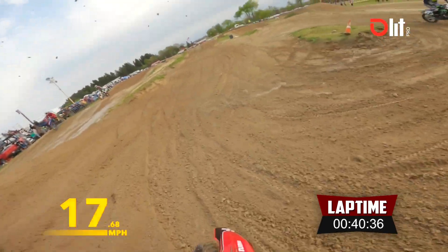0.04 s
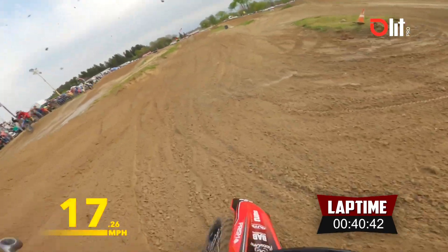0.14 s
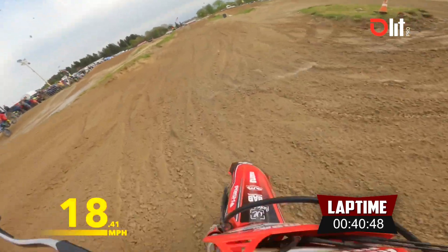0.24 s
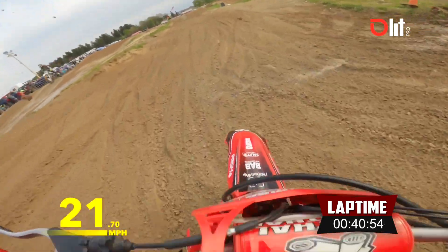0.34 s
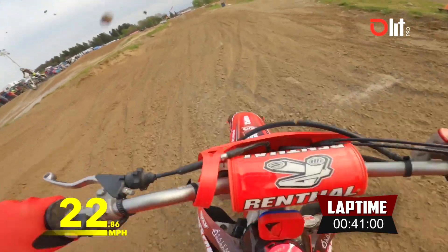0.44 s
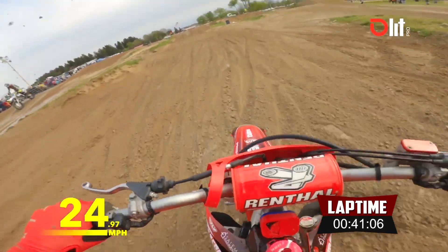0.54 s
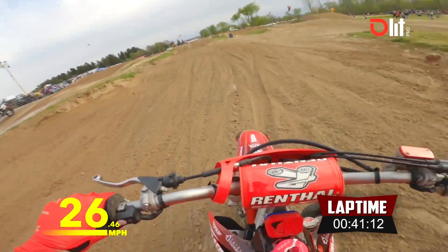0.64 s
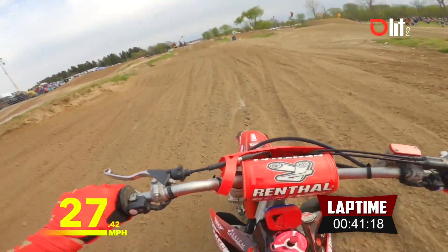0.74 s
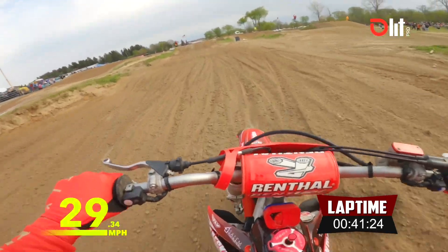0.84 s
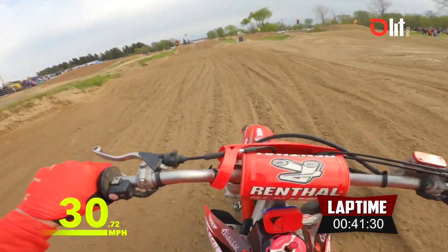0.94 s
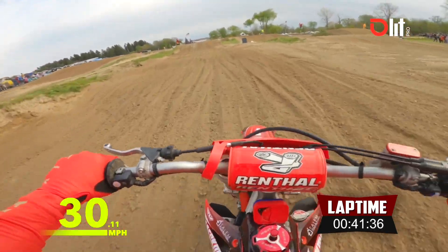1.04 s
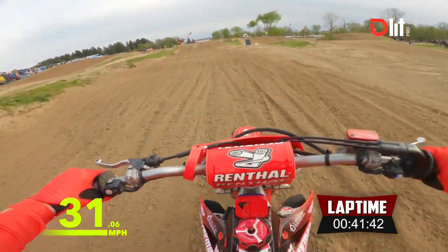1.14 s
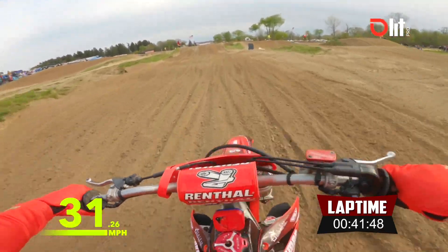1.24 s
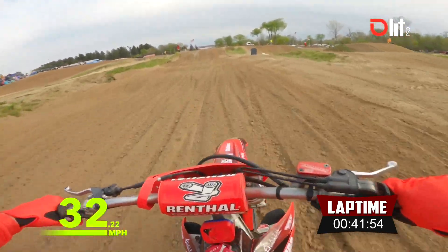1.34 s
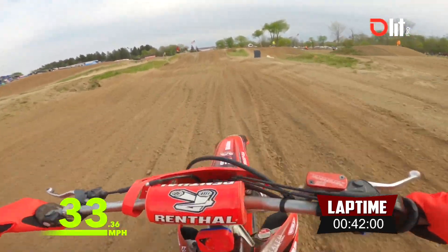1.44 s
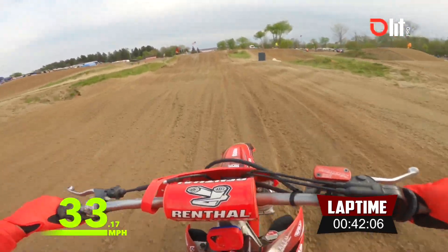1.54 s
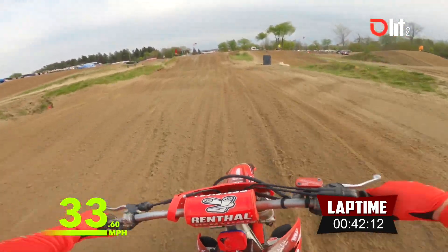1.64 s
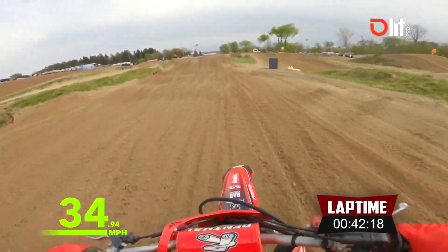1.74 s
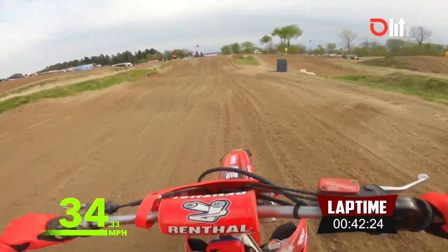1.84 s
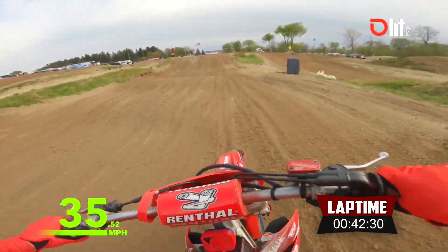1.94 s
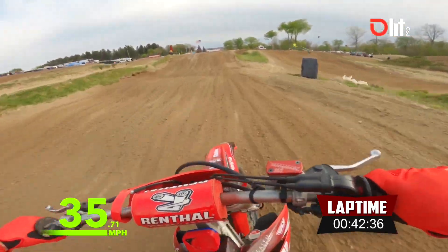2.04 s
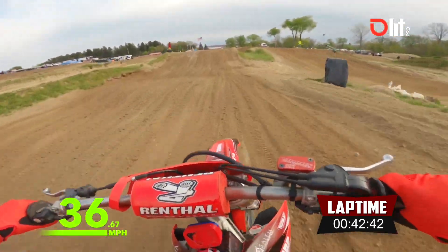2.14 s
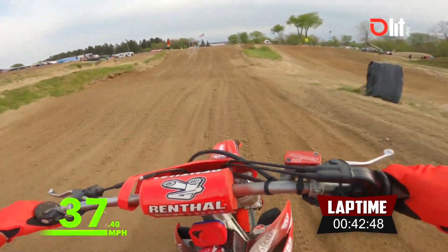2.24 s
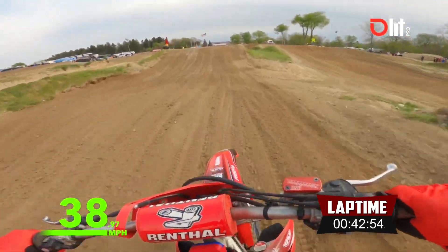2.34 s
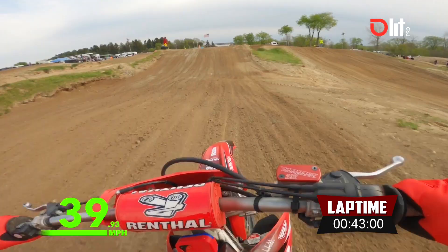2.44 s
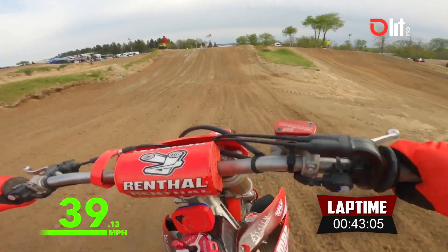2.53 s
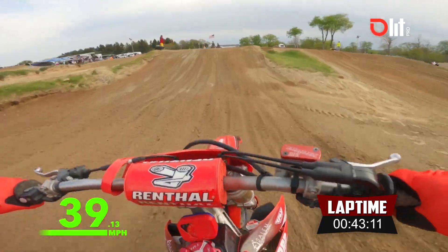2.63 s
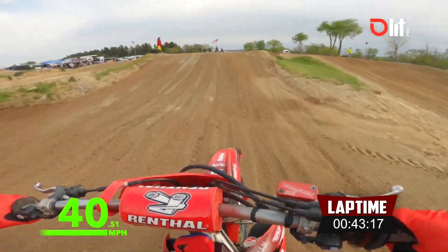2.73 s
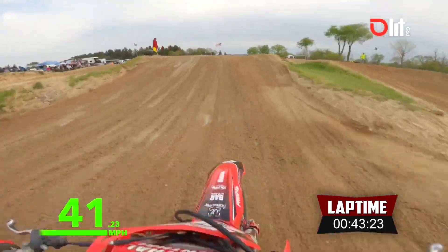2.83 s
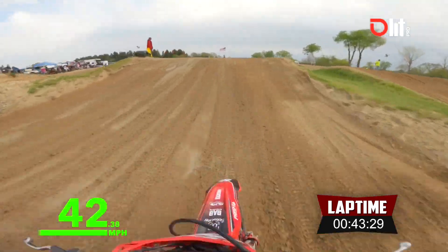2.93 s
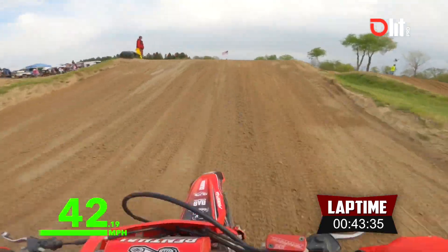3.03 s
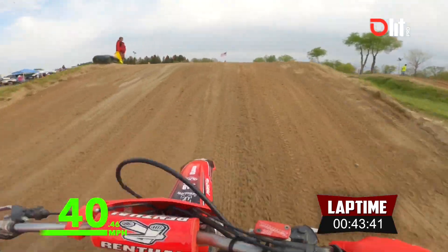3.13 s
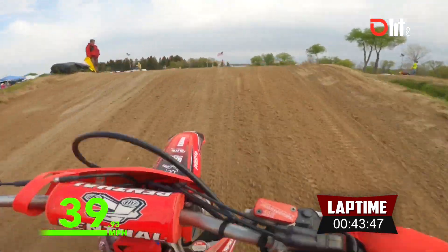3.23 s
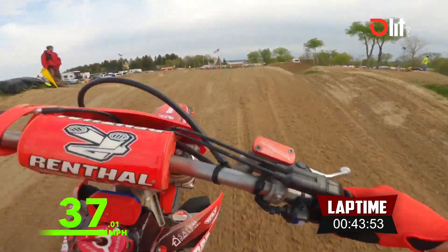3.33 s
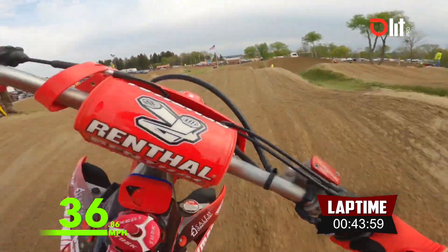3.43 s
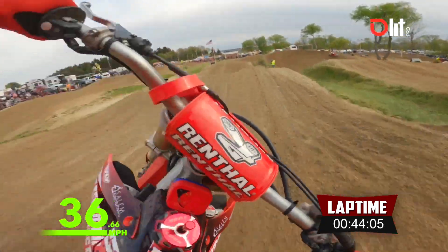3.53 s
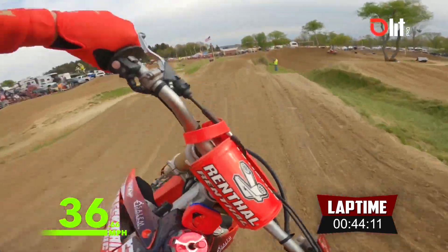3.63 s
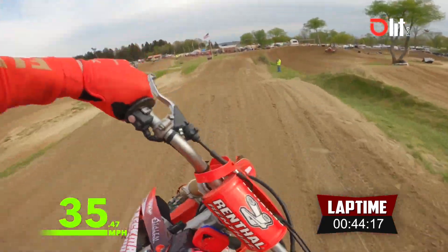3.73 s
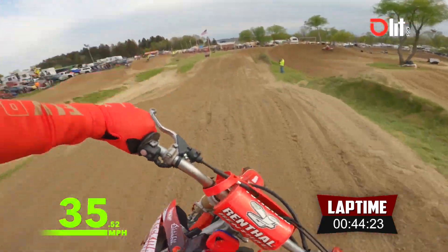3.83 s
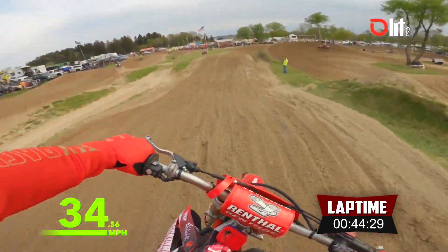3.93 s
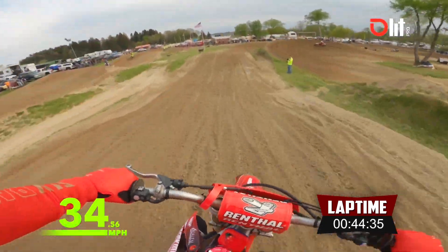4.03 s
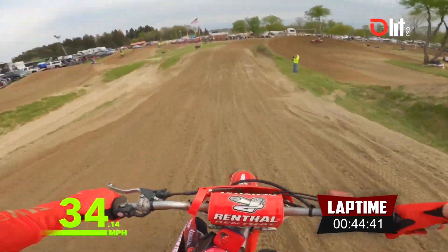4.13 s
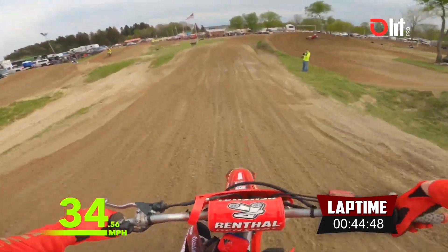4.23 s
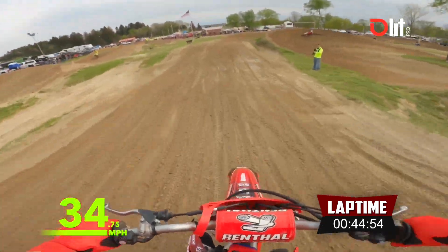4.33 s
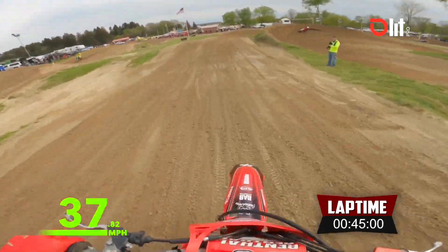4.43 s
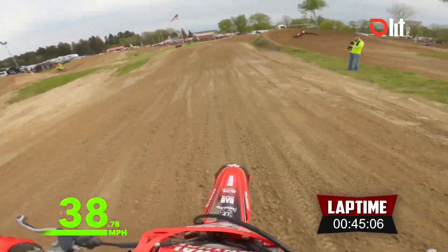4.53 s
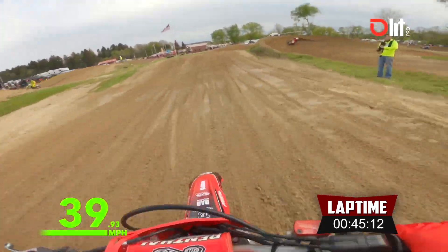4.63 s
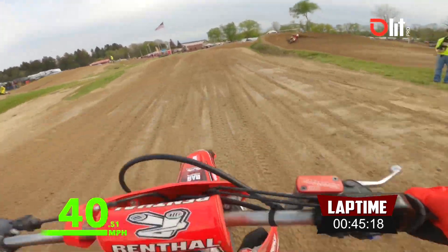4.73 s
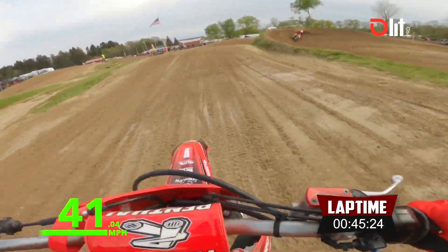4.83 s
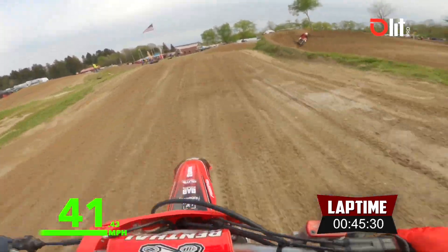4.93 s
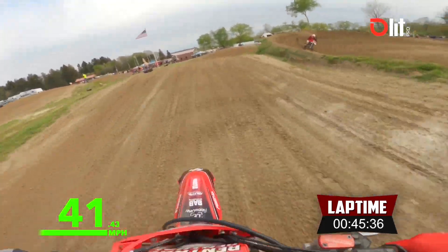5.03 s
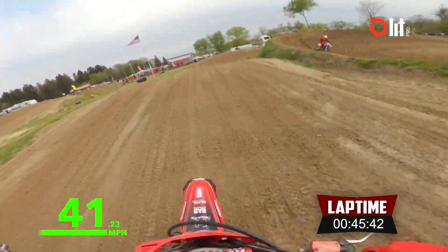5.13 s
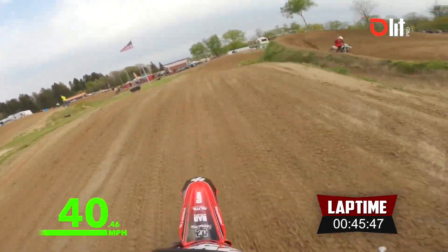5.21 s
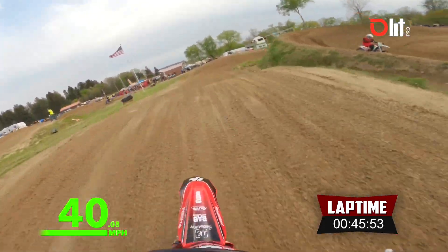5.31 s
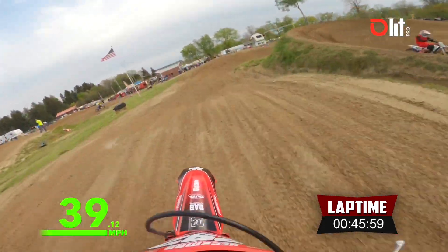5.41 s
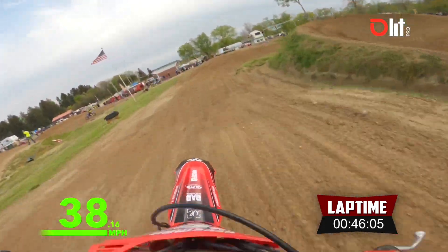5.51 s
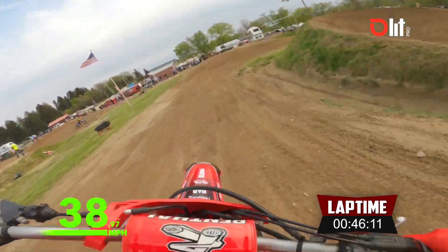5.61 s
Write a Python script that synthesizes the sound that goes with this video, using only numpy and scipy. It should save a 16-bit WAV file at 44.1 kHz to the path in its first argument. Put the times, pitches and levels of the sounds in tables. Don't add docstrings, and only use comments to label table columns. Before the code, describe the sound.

Heard from the rider's helmet outdoors, a single-cylinder dirt bike pulls with a boomy, raspy roar, climbs, dips at a gear change, then climbs again. The throttle shuts in the air and the note sags to rough chugs. A dull, heavy landing slam brings a sudden rev flare, a short airborne drop, a second softer hit, another pull and a final easing. Wind flutters and thumps throughout.

```python
import sys
import numpy as np
from scipy import signal
from scipy.io import wavfile
from scipy.ndimage import uniform_filter1d, minimum_filter1d

SR = 44100
rng = np.random.default_rng(int(sys.argv[2]) if len(sys.argv) > 2 else 0)


def nominal_scale(level):
    x = np.asarray(level, float) / 20
    return 10 ** x


def to_wav(s):
    ch = np.atleast_2d(s).T
    pcm = np.round(np.clip(ch, -1, 1) * 32767)
    wavfile.write(sys.argv[1], SR, pcm.astype(np.int16))


N = 250047
MOVE_S = 0.02


def evened(x):
    return x / np.sqrt(np.mean(x ** 2) + 1e-20)


def read(points, hz):
    f, value = np.transpose(points)
    return np.interp(np.log(hz + 1), np.log(f + 1), value)


def columns(rows):
    s, *cols = np.transpose(rows)
    return [np.interp(np.arange(N) / SR, s, c) for c in cols]


def held(rows):
    times, *cols = np.transpose(rows)
    at = np.maximum(np.searchsorted(times, np.arange(N) / SR, "right") - 1, 0)
    return [uniform_filter1d(c[at], int(MOVE_S * SR)) for c in cols]


def during(rows):
    t = np.arange(N) / SR
    gates = sum(share * ((t > start) & (t < end)) for start, end, share in rows)
    return uniform_filter1d(gates, int(MOVE_S * SR))


def bumps(rows):
    t = np.arange(N) / SR
    return sum(np.interp(t, [s - rise, s, s + fall], [0, top, 0]) for s, top, rise, fall in rows)


def wander(hz):
    size = max(int(SR / hz / 2), 1)
    once = uniform_filter1d(rng.standard_normal(N), size)
    return evened(uniform_filter1d(once, size))


def noise(points, patchy_db, size=512):
    hop = size // 4
    real, imaginary, patches = rng.standard_normal((N // hop + 5, size // 2 + 1, 3)).T
    patches = evened(uniform_filter1d(uniform_filter1d(patches, 5, 0), 20, 1))
    colour = read(points, np.fft.rfftfreq(size, 1 / SR))[:, None]
    z = (real + 1j * imaginary) * nominal_scale(colour + patchy_db * patches)
    return evened(signal.istft(z, nperseg=size, noverlap=size - hop)[1][:N])


def resonate(x, hz, width):
    turn = np.exp(2j * np.pi * hz * np.arange(len(x)) / SR)
    r = np.exp(-np.pi * width / SR)
    return (turn * signal.lfilter([1], np.convolve([1, -r], [1, -r]), x / turn)).real


# time in seconds, firing rate in Hz.
GRIPPING_SPEED = [(0.0, 83.2), (0.405, 84), (1.135, 99), (1.27, 71), (1.39, 83), (1.705, 81.8),
                  (1.95, 68.1), (2.635, 83.8), (2.88, 94.1), (3.115, 81.5), (3.465, 69.6), (3.97, 52),
                  (4.27, 106), (4.505, 92.4), (4.75, 76.6), (5.155, 86.3), (5.26, 76), (5.67, 65)]
# peak in seconds, change in Hz, rise in seconds, fall in seconds.
TYRE_SLIPS = [(.16, 6.5, 0.05106, .245), (.475, 7, 0.063, .16), (.69, 7.5, .055, .07),
              (.89, 3.5, 0.087, 0.0816), (1.06, 4, 0.11, 0.0747), (1.17, -5.5, 0.027, 0.0403),
              (1.21, 7, 0.043, 0.06085), (1.335, -4, .065, 0.0527), (1.49, -2.5, 0.12, .035),
              (1.735, -7, 0.024, 0.02924), (1.765, 2.5, 0.034, 0.061), (1.83, -10, 0.058, 0.0406),
              (1.87, 6, 0.03825, .08), (2.21, 7, 0.14, 0.0429), (2.31, 6.5, 0.05, .11),
              (2.46, 13, 0.086, .175), (2.975, 22, .095, .14), (3.03, 9, .07, .07), (3.145, 3, 0.036, .06),
              (3.21, -4, 0.079, .25), (4.0, 10, 0.0307, .07), (4.6, 14.5, .095, .15), (4.85, 2, 0.098, .07),
              (4.925, -2, .07, 0.043), (5.155, 4.5, 0.06, .08), (5.465, 3, 0.079, 0.23)]


def firing_rate():
    return uniform_filter1d(columns(GRIPPING_SPEED)[0] + bumps(TYRE_SLIPS), int(0.036 * SR))


# start in seconds, end in seconds, share from 0 to 1.
WHEELSPIN = [
    (1.18, 1.32, .5),
    (1.71, 1.9, .6),
    (2.9, 3.14, .6),
    (3.98, 4.24, .9),
    (4.51, 4.7, .9),
]


def wheelspin():
    return during(WHEELSPIN)


# start in seconds, end in seconds, share from 0 to 1.
COASTING = [
    (3.15, 3.75, .5),
    (4.26, 4.515, 1),
]


def coasting():
    return during(COASTING)


# frequency in Hz, level in dB.
AIRBOX_OPEN = [(120, -35), (165, -20.5), (200, -14.5), (250, -7.5), (330, -10.5), (370, -20.5), (420, -28),
               (500, -27.5)]
# frequency in Hz, level in dB.
AIRBOX_SHUT = [(110, -37), (140, -32.5), (200, -23), (270, -31.5), (350, -27.5), (420, -34.5), (530, -47.5)]


def airbox(hz, throttle, tuning, thud_db, bark_db):
    free = coasting()
    levels_db = []
    for k in range(2, 6):
        opened = throttle * read(AIRBOX_OPEN, k * hz / tuning)
        shut = (1 - throttle) * read(AIRBOX_SHUT, k * hz)
        crank_db = 0.5 * free * (-1) ** k
        levels_db.append(opened + shut + thud_db * (k == 2) + bark_db * (k == 5) + crank_db)
    return levels_db


# firing rate in Hz, level in dB.
FIRST_ORDER = [(50, -33.5), (72, -31.5), (85, -32), (95, -40), (115, -33)]


def boom(turns, hz, levels_db):
    spin = wheelspin()
    out = nominal_scale(read(FIRST_ORDER, hz) + 2.3 * wander(1.5)) * np.cos(2 * np.pi * turns)
    dispersion = 1.2 * np.clip((hz - 55) / 20, 0, 1)
    for k, db in enumerate(levels_db, 2):
        rough = spin * wander(61)
        lag = dispersion * (k - 3.5) ** 2 + 2.12 * (k - 1) + .25 * wander(2) + .22 * rough
        level = nominal_scale(db + 1.1 * wander(30) + 1.5 * rough)
        out = out + level * np.cos(2 * np.pi * k * turns - lag)
    return np.sqrt(2) * out


def orders(turns, hz, colour, numbers, shimmer_db):
    free, spin = coasting(), wheelspin()
    shaky = turns + (.002 + .012 * spin) * wander(60)
    out, power = 0, 0
    for k in numbers:
        crank_db = free * (-6 * (k % 2) + 4 * (k % 6 == 0) + 3 * (k == 6))
        dulling_db = 14 * spin * np.log2(k)
        height = nominal_scale(read(colour, k * hz) + crank_db - dulling_db)
        drift = .33 * wander(5) - .03 * max(k - 10, 0) ** 2
        out = out + height * nominal_scale(shimmer_db * wander(9.5)) * np.cos(2 * np.pi * k * shaky + drift)
        power = power + height ** 2 / 2
    return out / np.sqrt(power)


# frequency in Hz, level in dB.
PIPE_COLOUR = [(300, 13), (400, 9), (500, 5), (580, 2), (680, 3.5), (780, -6.5), (900, -1.5), (1050, -6),
               (1300, -10)]


def pipe_note(turns, hz, level_db):
    return nominal_scale(level_db - 2.5) * orders(turns, hz, PIPE_COLOUR, range(6, 11), shimmer_db=3.0)


# frequency in Hz, density in dB per Hz.
RASP = [(300, -28.5), (600, -9), (900, 0), (1300, 1.5), (1550, 0), (1750, 3.5), (2200, -8.5), (3000, -17.5),
        (4500, -36.5)]
# frequency in Hz, density in dB per Hz.
CLATTER = [(1500, -3), (2600, -2), (3800, -6), (4400, -8), (5000, -13.5), (5800, -17), (7400, -20),
           (8600, -27.5), (9800, -35.5), (11300, -41.5), (12200, -35.5), (13400, -63), (15400, -39.5),
           (20000, -76.5)]


def rattle(turns, hz, rasp_db, clatter_db, pulsing):
    blow = nominal_scale(0.52 * rng.standard_normal(N)[turns.astype(int)])
    main_burst = blow * np.exp(-((turns + 0.24) % 1) / 0.42)
    burst = main_burst + 0.23 * np.exp(-((turns + 2.0) % 1) / 0.21)
    burst = evened(uniform_filter1d(burst, 30))
    share = np.clip(pulsing, .35, .88)
    gate = np.sqrt(1 - .7 * share + .7 * share * burst ** 2)
    crack = np.sqrt(share) * orders(turns + .3, hz, RASP, range(11, 34), shimmer_db=2.6)
    rush = np.sqrt(1 - share) * gate * noise(RASP, patchy_db=-0.5)
    valves = nominal_scale(clatter_db + 1.5) * np.sqrt(gate) * noise(CLATTER, patchy_db=1.5)
    return nominal_scale(rasp_db) * (crack + rush) + valves


# time in seconds, flutter level in dB.
AIRFLOW = [(0, -31), (1.07, -35.5), (1.17, -28), (1.7, -24), (2.08, -22.5), (2.2, -37), (2.29, -25),
           (2.43, -36), (2.87, -42.5), (3.16, -28), (3.76, -20.5), (3.84, -35), (3.99, -16), (4.18, -32.5),
           (4.3, -30), (4.95, -27.5), (5.2, -22.5), (5.67, -24)]
# peak in seconds, extra level in dB, length in seconds.
BUFFETS = [(1.561, 9, 0.055), (1.76, 20, .12), (2.083, 18, 0.078), (3.273, 21.5, 0.077), (3.469, 18, 0.12),
           (3.698, 20.5, 0.21), (4.498, 8, .06), (4.771, 7, 0.13), (5.217, 4, .06), (5.42, 11, .15),
           (5.571, 22, 0.11)]
# frequency in Hz, density in dB per Hz.
GUST = [(15, -9), (30, 0.5), (50, -5), (75, -16), (150, -33), (1000, -81.5), (20000, -130)]
# frequency in Hz, density in dB per Hz.
FLUTTER = [(30, -24.5), (60, -5.5), (90, -4), (130, -5), (250, -8.5), (450, -16.5), (900, -48.5),
           (2000, -77.5), (20000, -130)]


def wind():
    flutter_db = columns(AIRFLOW)[0]
    gust_db = -41 + 0.22 * (flutter_db - flutter_db.mean())
    gust_db = gust_db + bumps([(s, db, length, length) for s, db, length in BUFFETS])
    gusts = nominal_scale(gust_db + 2.7 * wander(11.0)) * noise(GUST, patchy_db=-6.5, size=2048)
    flutter_level = nominal_scale(flutter_db - 1.0 + 0.57 * wander(4.3))
    return gusts + flutter_level * noise(FLUTTER, patchy_db=0.5, size=2048)


# start in seconds, end in seconds, frequency in Hz, width in Hz, level in dB.
CASING_RINGS = [(3.15, 3.62, 1710, 70, -31.5), (3.45, 3.95, 1200, 130, -35), (3.1, 3.62, 4380, 170, -38.5),
                (3.4, 3.6, 2300, 80, -38), (4.35, 4.55, 4200, 110, -39), (4.75, 5.67, 4400, 130, -49),
                (1.45, 1.72, 1370, 110, -32), (.2, 1, 1720, 90, -39), (5.3, 5.67, 1200, 150, -40),
                (1.9, 2.45, 1380, 150, -35), (1.55, 1.8, 3400, 400, -42)]


def casing_rings(turns):
    knocks = evened(np.diff(np.floor(turns), prepend=0))
    out = np.zeros(N)
    for start, end, hz, width, db in CASING_RINGS:
        span = slice(int(start * SR), int(end * SR))
        shaking = knocks + 0.55 * rng.standard_normal(N)
        part = evened(resonate(shaking, hz, width))[span]
        out[span] += nominal_scale(db) * part * signal.windows.tukey(len(part), .8)
    return out


# start in seconds, level in dB, 60 dB decay time in seconds.
SLAMS = [
    (1.272, -19.5, .15),
    (1.825, -19, .2),
    (3.99, -13.5, .7),
    (4.513, -20, 0.23),
    (5.165, -30, 0.18),
]
# frequency in Hz, density in dB per Hz.
SLAM_COLOUR = [(60, -28.5), (150, -11.5), (300, 1.5), (600, 4), (800, -20.5), (1500, -42.5), (20000, -120)]


def slams():
    t = np.arange(N) / SR
    shape = sum(np.clip((t - s) / 0.0037, 0, 1) * nominal_scale(db - 60 * abs(t - s) / t60) for s, db, t60 in SLAMS)
    return shape * noise(SLAM_COLOUR, patchy_db=2.5)


# time in seconds, throttle from 0 to 1, airbox tuning ratio under load, crank thud in dB.
THROTTLE = [(0, 0.83, 1.056, -0.5), (.2, 0.88, 1.09, -4.5), (.43, 1, 1, 0.1), (.6, 1, .91, -1.5),
            (1.15, 0.4, 0.83, -2.5), (1.22, 0.39, 0.83, -4), (1.3, 0.78, 0.96, 5), (1.36, 0.9, 0.92, 0.5),
            (1.71, 0, 0.57, 4), (1.74, 0.57, 0.78, -0.5), (1.85, .75, 0.94, 3), (2.0, 0.94, 0.88, 0.8),
            (2.12, 0.92, 0.92, 1), (2.44, 0.9, .98, 0.4), (2.9, 0.73, 1.02, 3.7), (3.03, 0.63, 1.06, -1.5),
            (3.125, .15, 0.99, -7), (3.17, 0.11, 1, -5), (3.75, 0.56, 0.71, -5.5), (4.002, 0.83, 0.97, 9.5),
            (4.1, 1, 1.045, 1.5), (4.24, 0, .9, 4.6), (4.38, 0.15, 1.17, 5.3), (4.515, 0.68, 1.13, 4.5),
            (4.68, 0.87, 1.03, 0.5), (4.95, 0.87, 1, -.3), (5.14, 0.08, 0.9, -3.5), (5.24, 0.26, 0.8, -2.5),
            (5.41, 0, 0.78, -9), (5.5, 0, 1.1, 2)]
# time in seconds, bark of upper orders in dB,
# exposure to the exhaust in dB, exposure to the engine case in dB.
POSTURE = [(0, -2.5, -4, -3.5), (.3, -8.5, -3, -4), (.45, -4, -1.5, -0.5), (.85, -4, -2, 0),
           (1.15, -6, -3.2, 3), (1.24, -2, -4.5, -0.5), (1.35, 1, 2, 1.8), (1.72, -11, -7, 4),
           (1.8, -12, -2.5, 0.5), (1.85, 2.5, 3.5, 2), (2.0, 0, 3, 2), (2.12, 8, 4, 3),
           (2.44, 1.5, 1.6, 0.3), (2.8, -0.5, -1.2, -1.5), (2.9, 6.5, 2, 2.5), (3.12, 2, -4, 2),
           (3.42, 1, -0.3, 3.5), (3.75, -4, -2, 1.5), (3.98, 6.5, -1.2, 2), (4.015, 9, -5, -4.5),
           (4.12, 6, -7.5, 2), (4.24, 8, -9.5, 2.5), (4.3, 3, -1, 6.5), (4.52, 5, 2, 2.5),
           (4.68, -5, -0.4, -2.5), (4.93, 7, 0, -1), (5.12, 4, -0.4, 0.9), (5.26, 1.5, -3, -0.1),
           (5.5, 1.6, 0.9, -0.5)]


def scene():
    hz = firing_rate()
    throttle, tuning, thud_db = held(THROTTLE)
    bark_db, exposed_db, case_db = held(POSTURE)
    throttle = np.clip(throttle, 0, 1)
    turns = .12 + np.cumsum(hz * (1 + .003 * wander(20))) / SR
    note_db = -34.5 + 5 * throttle + 0.54 * bark_db + 0.12 * exposed_db
    note_db = note_db + 3.5 * throttle * wheelspin()
    pulsing = .35 + .35 * throttle + .5 * coasting() + .045 * exposed_db
    engine = boom(turns, hz, airbox(hz, throttle, tuning, thud_db, bark_db))
    engine = engine + pipe_note(turns, hz, note_db)
    engine = engine + rattle(turns, hz, -31 + exposed_db, -34 + case_db, pulsing)
    return (engine + wind() + casing_rings(turns) + slams())[None]


def roll_off(x):
    return signal.sosfilt(signal.butter(12, 15700, fs=SR, output="sos"), x)


def record(dry):
    envelope = uniform_filter1d(-minimum_filter1d(-abs(dry), 700, axis=1), 700, axis=1)
    held_down = dry / np.maximum(envelope / .72, 1) ** .8
    return roll_off(held_down)


dry = scene()
out = record(dry)
to_wav(out)
```